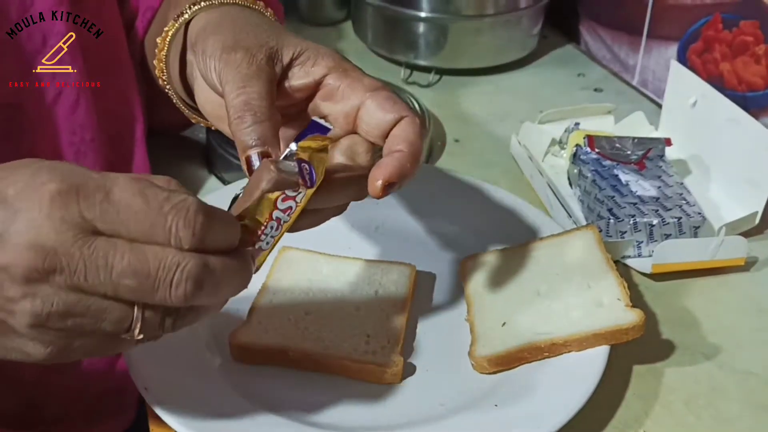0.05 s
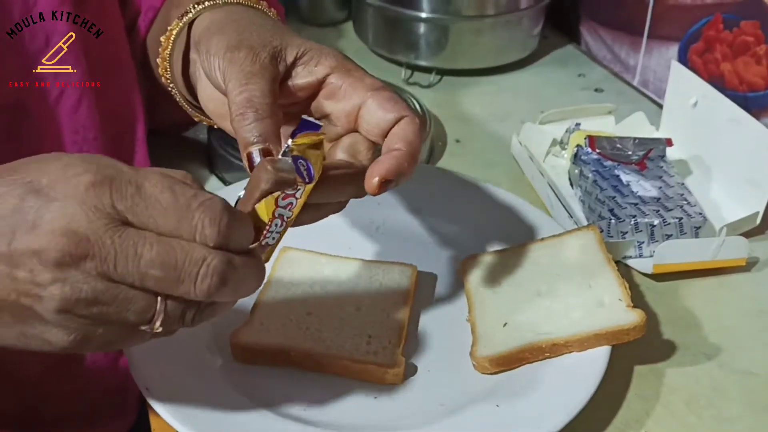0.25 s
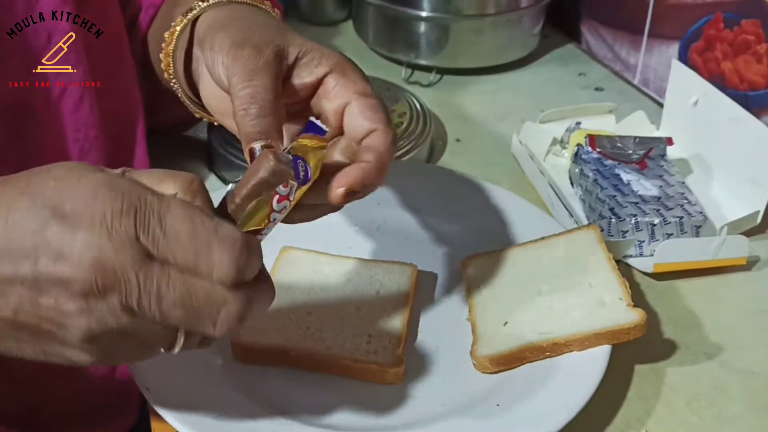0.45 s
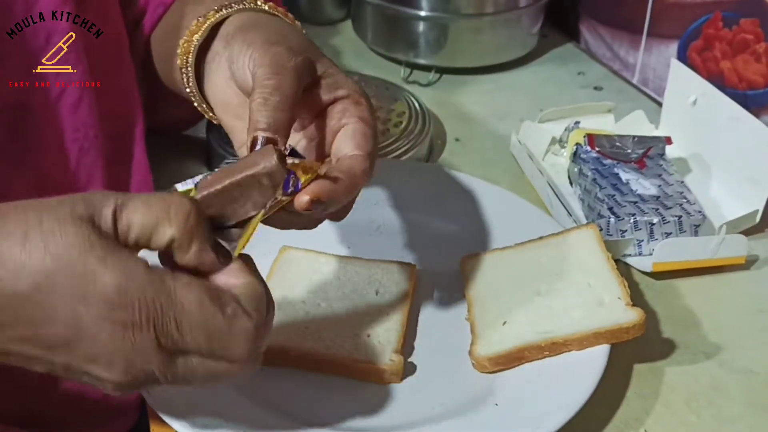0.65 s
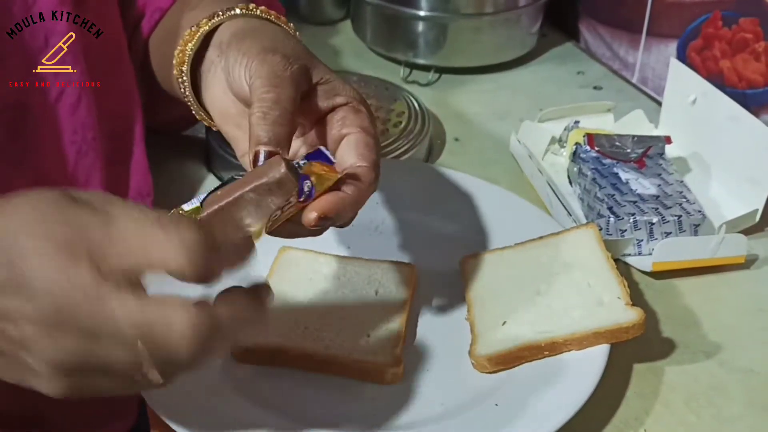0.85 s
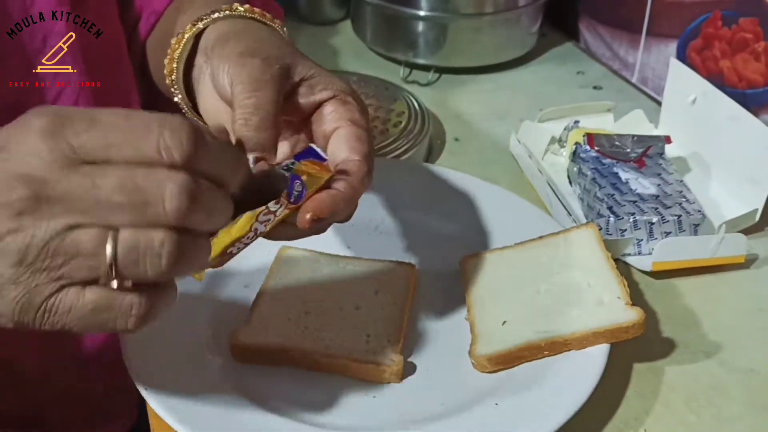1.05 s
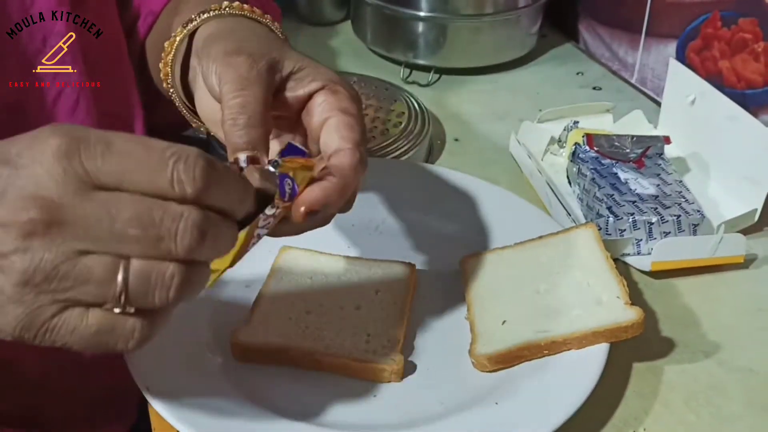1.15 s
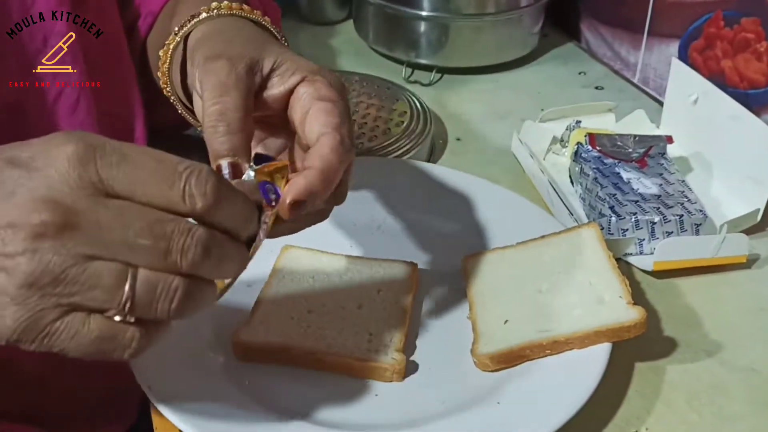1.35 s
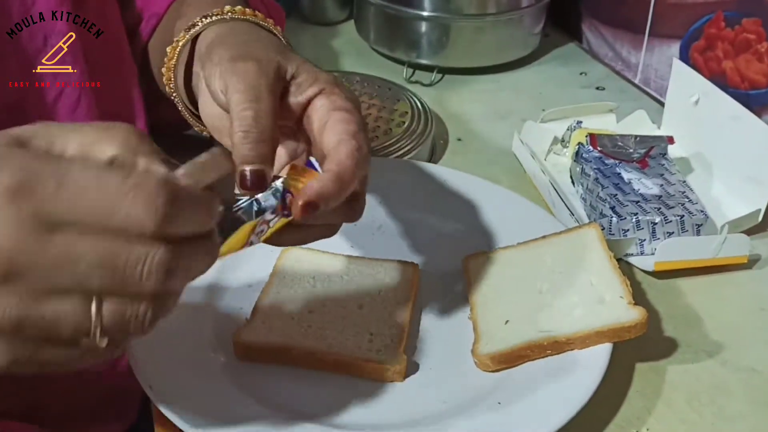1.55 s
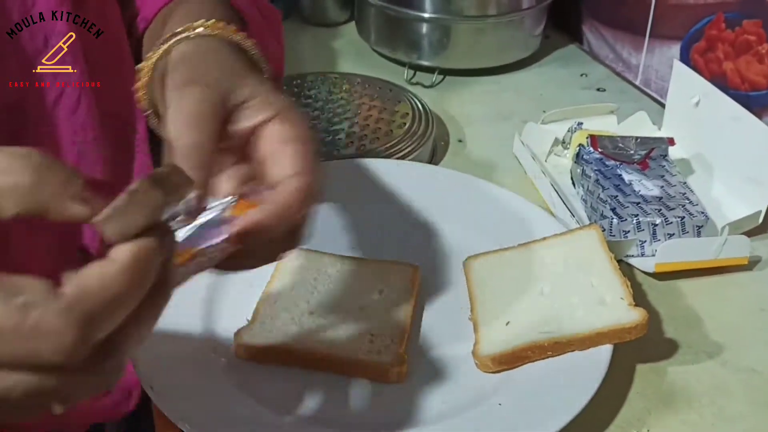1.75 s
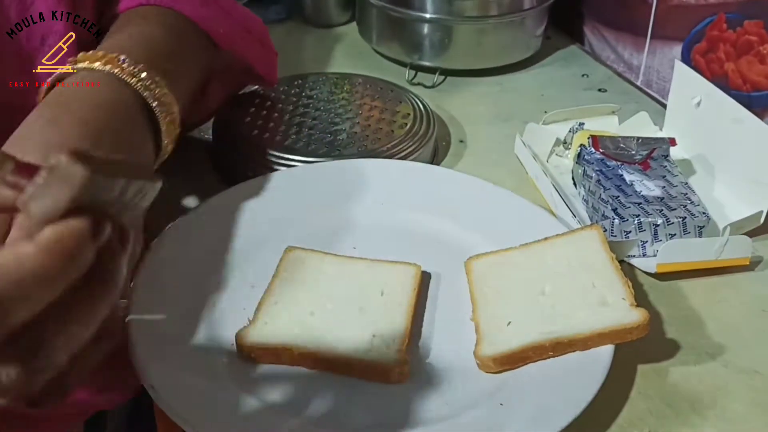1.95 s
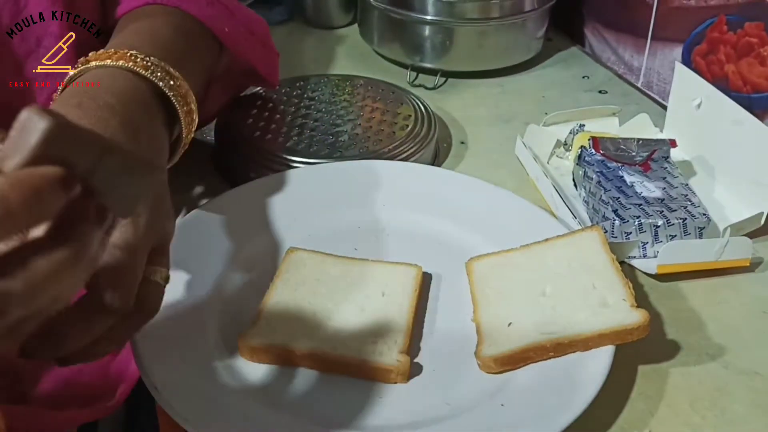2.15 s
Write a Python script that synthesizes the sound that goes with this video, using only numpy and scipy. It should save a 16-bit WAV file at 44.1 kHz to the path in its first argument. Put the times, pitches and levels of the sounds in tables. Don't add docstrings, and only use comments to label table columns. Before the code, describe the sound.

Foil candy wrapper crackling sharply as fingers tear and peel it, close up in a kitchen

```python
import sys
import numpy as np
from scipy import signal
from scipy.fft import rfft, irfft
from scipy.io import wavfile

SR = 44100
rng = np.random.default_rng(int(sys.argv[2]) if len(sys.argv) > 2 else 0)


def rack_gain(trim_db):
    fader = np.asarray(trim_db, float)
    return 10 ** (fader / 20)


def generate_wav(sig):
    pcm = np.round(np.clip(np.atleast_2d(sig).T, -1, 1) * 32767).astype(np.int16)
    wavfile.write(sys.argv[1], SR, pcm)


N = 97020


def rms_one(x):
    return x / np.sqrt(np.mean(x ** 2) + 1e-20)


def ring(clicks, hz, t60):
    r = rack_gain(-60 / (t60 * SR))
    w = 2 * np.pi * min(hz, 0.45 * SR) / SR
    return signal.lfilter([0, np.sin(w)], [1, -2 * r * np.cos(w), r * r], clicks + 1e-18)


def bandpass(x, order, edges_hz):
    return signal.sosfilt(signal.butter(order, edges_hz, "band", fs=SR, output="sos"), x)


def colour(x, points):
    hz, db = np.transpose(points)
    f = np.maximum(np.arange(len(x) // 2 + 1) * SR / len(x), 1)
    gain = rack_gain(np.interp(np.log(f), np.log(hz), db))
    return irfft(rfft(x) * gain, len(x))


# pitch_hz, level_db
FAN_COLOUR = [(25, -35.5), (60, -8.5), (130, -2), (350, -13.5), (750, -17), (1100, -24), (7500, -21.5),
              (11000, -28.5), (16000, -45.5)]


def fan():
    return rack_gain(-53) * rms_one(colour(rng.standard_normal(N), FAN_COLOUR))


# time_s, level_db
HANDLING = [(0, -47.5), (.15, -41.5), (.32, -54.5), (.45, -34), (.75, -43), (.84, -45), (0.959, -30.5),
            (1.051, -52.5), (1.3, -46), (1.4, -49.5), (1.6, -31.5), (1.702, -42), (1.748, -18),
            (1.849, -79), (1.998, -34.5), (2.2, -55.5)]
# pitch_hz, level_db (per Hz)
CRACKLE_COLOUR = [(400, -22.5), (900, -24.5), (2000, -19.5), (3500, -13), (5300, -12), (7800, -4),
                  (10500, -15), (14000, -10)]
CRACKLES_PER_S, CRACKLE_SIZE_DB, CRACKLE_DB = 6000, 3, -8


def crackle():
    clump = np.repeat(rng.standard_normal(N // 300 + 1), 300)[:N]
    sizes = rack_gain(CRACKLE_SIZE_DB * np.minimum(rng.exponential(1, N), 3)) * rng.choice([-1, 1], N)
    born = rng.random(N) < CRACKLES_PER_S * rack_gain(3.0 * clump) / SR
    patch_of = rng.integers(0, 8, N)
    edges = np.geomspace(500, 16000, 10)
    patches = np.zeros(N)
    for k in range(8):
        clicks = sizes * born * (patch_of == k) + 1e-18
        patches += bandpass(clicks, 2, edges[[k + 1, k + 2]] * [0.9, 1])
    time_s, effort_db = np.transpose(HANDLING)
    level = rack_gain(np.interp(np.arange(N) / SR, time_s, effort_db) + CRACKLE_DB)
    return level * rms_one(colour(patches, CRACKLE_COLOUR))


# start_s, peak_db, then low_body_db, mid_band_db, top_fizz_db (these three are
CREASES = [(0.052, -33, -3, -10, -4), (0.0739, -11.5, -26, -17, -4.5), (0.1009, -17.5, -19, -1, 2.5),
           (0.106, -31.5, 0, 13, -2.5), (0.1109, -30.5, -4, -3, -5), (0.179, -37, -18, -6, 8),
           (0.1865, -29, -20, -4, -6), (0.201, -10.5, -14.5, -6, -10.5), (0.242, -22, -17, -17, -0.5),
           (0.2584, -10, -28.5, -12.5, -5), (0.2666, -30.5, -7, 2, 4), (0.3341, -13.5, -17, -9.5, 3.5),
           (0.3828, -3.5, -33.5, -17.5, -1.5), (0.3975, -23, -28, -9, -13.5), (0.4282, -6.5, -27.5, -11.5, -9),
           (0.4448, -17, -25.5, -9.5, -4.5), (0.489, -23, -24, -3, 5), (0.5248, -18.5, -31, -12, -6),
           (0.5387, -8.5, -20, -10, 0.5), (0.5488, -14, -19, -10, 0), (0.5752, -25.5, -28.5, -5, -11.5),
           (0.5924, -33, -15, -10, 0.5), (0.6204, -10.5, -31.5, -1.5, -2), (0.6263, -28.5, -10, 3, 3),
           (0.6454, -16.5, -8, -1, 1), (0.6672, -16, -41.5, -3, -19),
           (0.6892, -13, -30, -8, -1), (0.6956, -4.5, -19.5, 12, -4.5), (0.7013, -4.5, -18, -3.5, -5.5),
        (0.7246, -16, -12, -7, -5), (0.7316, -18.5, -18.5, 2, -13), (0.7455, -5, -21.5, -8.5, -8.5),
        (0.7526, -15, -13, -8.5, -2.5), (0.7927, -10, -13, -4.5, -4.5), (0.8464, -26, -34.5, -3, -1),
        (0.8579, -16, -18.5, 2, -8.5), (0.8889, -29, -26, -9, -4.5), (0.9037, -29.5, -27.5, -10, 9.5),
        (0.917, -22, -24.5, -6, -9), (0.9215, -13.5, -14.5, 1, -2), (0.9351, -16, -21.5, -0.5, -4.5),
        (0.9432, -14, -20.5, -8, -2.5), (0.9529, -13, -28.5, 1, 1), (0.9649, -17.5, -16.5, -0.5, -3),
        (1.0028, 1.5, -38, -21, -20.5), (1.0074, -11, -21, -13.5, 1), (1.0195, -34, -29.5, -17.5, -13),
        (1.0689, -26.5, -29, -9, -0.5), (1.151, -51, -12, -2.5, -5.5), (1.16, -52, -28, -16.5, -7),
        (1.199, -34.5, -16.5, -17, -3), (1.2064, -30, -32, -8, -11),
           (1.2244, -30, -14, -4, 3), (1.2479, -23.5, -13, -10.5, -12), (1.323, -25.5, -35, -8, -4),
         (1.3534, -35.5, -21, -4, 2), (1.364, -24.5, -20, -2, -8), (1.3749, -31.5, -12, -13.5, -8),
         (1.4072, -25, -30, -8, -1.5), (1.4691, -40, -12, -7, 5.5), (1.4871, -24, -42, -18, -7),
         (1.4978, -18, -46, -22, -3), (1.5247, -7.5, -13.5, -6.5, -11.5), (1.5917, -24.5, -10.5, -10, -13),
         (1.6335, -26, -2, 8, -8), (1.6527, -17.5, -9, -6, 6), (1.6625, -11, -17, -8, -6),
         (1.6832, -16.5, -24, -11, 4), (1.7105, -33, 3, 7, -11), (1.7242, -8.5, -16, 1.5, -1.5),
         (1.7409, -9, -14, -5, -7), (1.7612, -14, -9.5, -2, 1), (1.8039, -21, -16, -10, 3),
         (1.9583, -28, -20, -7, -2.5), (2.005, -19.5, -14, -6.5, -9), (2.0147, -28, -24, -3, -4),
         (2.0698, -35, -22, 0, 2), (2.1436, -36, -6.5, -2, -1)]
# start_s, peak_db
AGAIN = [(0.0749, -14), (0.076, -23), (0.079, -33), (0.181, -29), (0.2025, -19), (0.2049, -29),
         (0.205, -25), (0.2586, -22.5), (0.337, -30), (0.3845, -13), (0.3877, -26), (0.3901, -31),
         (0.3898, -14.5), (0.4293, -10.5), (0.4331, -22), (0.4353, -20), (0.4467, -5.5),
         (0.45, -16.5), (0.4517, -27), (0.4549, -22), (0.4906, -25), (0.4934, -22), (0.4965, -14.5),
         (0.4993, -12.5), (0.525, -24), (0.5428, -8.5), (0.5437, -9), (0.5522, -29), (0.5562, -24),
         (0.5952, -23.5), (0.5957, -25), (0.6207, -7.5), (0.6274, -20.5), (0.6468, -15.5),
         (0.6901, -16.5), (0.6965, -4), (0.6985, -13), (0.7028, -9.5), (0.7049, -17), (0.7342, -11),
         (0.7468, -4.5), (0.7564, -17.5), (0.758, -25.5), (0.7961, -21.5), (0.7988, -24.5),
         (0.8468, -24), (0.8592, -17.5),
         (0.8632, -29), (0.9248, -28), (0.9438, -14.5), (0.9544, -14), (0.9554, -28), (0.9599, -20),
              (0.9612, -18), (0.9683, -18.5), (0.9697, -15.5), (0.9732, -18), (1.0041, -5), (1.0096, -22),
              (1.012, -18), (1.0138, -17), (1.0166, -36), (1.0187, -34), (1.0694, -22.5), (1.2012, -30.5),
              (1.2026, -42), (1.2241, -25.5), (1.376, -34), (1.3775, -25), (1.3781, -17.5), (1.3794, -26.5),
              (1.4094, -29), (1.4693, -24), (1.4979, -19.5), (1.5, -29), (1.5259, -10.5), (1.5267, -26),
              (1.5287, -16.5), (1.5308, -23), (1.5317, -20), (1.5335, -41), (1.5936, -25.5), (1.596, -32),
              (1.6634, -12.5), (1.6651, -9.5), (1.6691, -28), (1.6708, -28), (1.7256, -11.5), (1.729, -11),
              (1.7302, -7.5), (1.7336, -28), (1.742, -12), (1.7633, -18), (1.806, -31.5), (1.9587, -22),
              (1.96, -20), (2.0065, -15), (2.0104, -31), (2.1475, -37)]
# centre_hz, width_octaves, gain_db
SNAP_ZONES = [
    (976, 1, -17),
    (1975, 1.0, -2.5),
    (3520, 0.66, 3),
    (5510, 0.5, 1.4),
    (7834, 0.29, 0.55),
    (9790, 0.54, -1.5),
    (13600, 0.18, 0.5),
]
ZONE_WANDER_OCT, ZONE_SCATTER_S = 0.03, 0.00015
PEAK_SPREAD_DB, SNAP_DB = 1.2, 1.5


def snaps():
    creases = CREASES
    again = np.array(AGAIN)
    owner = np.searchsorted([crease[0] for crease in creases], again[:, 0]) - 1
    luck = rng.standard_normal((len(creases), 7, 8, 3))
    size = 1024
    out = np.zeros(N + SR)
    for k, (s, db, low, mid, top) in enumerate(creases):
        times, peaks_db = np.vstack([[s, db], again[owner == k]]).T
        zone_levels_db = (low, low, 0.85 * low + 0.47 * mid, mid, 0, top / 2, top)
        sound, power = 0, 0
        for (hz, width, gain_db), zone_db, draw in zip(SNAP_ZONES, zone_levels_db, luck[k]):
            draw = draw[:len(times)]
            late_s = ZONE_SCATTER_S * np.abs(draw[:, 0])
            heights = rack_gain(peaks_db + PEAK_SPREAD_DB * draw[:, 1]) * np.sign(draw[:, 2])
            clicks = np.zeros((2, size))
            clicks[0, 0] = 1
            clicks[1, ((times - s + late_s) * SR).astype(int)] = heights
            octaves = ZONE_WANDER_OCT * draw[0, 2] + width * np.array([-0.5, 0.5])
            edges = np.minimum(hz * 2 ** octaves, [0.4 * SR, 0.45 * SR])
            unit, packet = bandpass(clicks, 3, edges)
            level = rack_gain(zone_db + gain_db)
            sound = sound + level * packet / np.abs(unit).max()
            power += level ** 2
        out[int(s * SR):][:size] += rack_gain(SNAP_DB) * sound / np.sqrt(power)
    return out[:N]


# pitch_hz, level_db
WALLS = [(500, 18), (1500, -3.5), (3500, 3), (7800, -10), (14000, -8)]
NEAR_DB, NEAR_T60_S = -22.5, 0.027
ROOM_DB, ROOM_T60_S = -29.5, 0.19


def kitchen(x):
    t = np.arange(SR // 2) / SR
    near, far = rng.standard_normal((2, len(t)))
    scatter = rack_gain(NEAR_DB - 60 * t / NEAR_T60_S) * near
    wash = rack_gain(ROOM_DB - 60 * t / ROOM_T60_S) * colour(far, WALLS)
    echoes = (scatter + wash) * np.minimum(t / 0.0009, 1)
    return x + signal.fftconvolve(x, echoes)[:N]


# start_s, length_s, level_db, pitch_hz
RUBS = [
    (.33, .24, -58, 620),
    (1.045, .055, -59, 770),
    (1.54, .1, -55, 540),
]


def rubs():
    out = np.zeros(N)
    t = np.arange(N) / SR
    for s, length, db, hz in RUBS:
        swell = np.sin(np.pi * np.clip((t - s) / length, 0, 1))
        hiss = rng.standard_normal(N)
        dull = ring(ring(hiss, hz, 5.0 / hz), hz, 5.0 / hz)
        out += rack_gain(db) * swell * rms_one(dull)
    return out


def knock(s, db, hz, t60):
    click = np.zeros(N)
    click[int(s * SR)] = rack_gain(db + 16)
    return ring(ring(click, hz, t60), hz, 3.0 / hz) * hz / SR


# start_s, peak_db, pitch_hz
THUMPS = [
    (.701, -37.5, 1300),
    (0.704, -40, 960),
    (0.746, -30, 890),
    (0.749, -42, 593),
    (1.003, -37.5, 172),
    (1.002, -38.5, 367),
    (1.226, -48.5, 880),
    (.578, -49, 886),
]


def thumps():
    return sum(knock(s, db, hz, 0.03) for s, db, hz in THUMPS)


# pitch_hz, level_db, t60_s
BANGLE = [(5900, -0.5, 0.15), (8480, -3, 0.2), (10000, 1.5, 0.032)]
TICK_S, TICK_DB = 2.069, -48


def bangle():
    return sum(knock(TICK_S, TICK_DB + db, hz, t60) for hz, db, t60 in BANGLE)


def scene():
    wrapper = kitchen(snaps() + crackle())
    return (wrapper + thumps() + bangle() + rubs() + fan())[None]


def band_limit(x):
    return signal.sosfilt(signal.butter(12, 16810, fs=SR, output="sos"), x)


# shut_s, reopen_s, depth_db
GATE = [
    (-.1, 0.097, 5.5),
    (0.303, 0.336, 7.5),
    (1.099, 1.193, 15.5),
    (1.281, 1.35, 8.5),
    (1.844, 1.96, 12.5),
    (2.086, 2.142, 8.5),
    (2.147, 2.3, 5.5),
]
GATE_FADE_S, GATE_BASS_SHARE = 0.015, 0.85
OVERLOAD, CUTOFF_HZ = 0.93, 15900


def record(dry):
    depth_db = np.zeros(N)
    t = np.arange(N) / SR
    for shut, reopen, db in GATE:
        closing = np.clip((t - shut) / GATE_FADE_S + 0.5, 0, 1)
        opening = np.clip((reopen - t) / 0.001, 0, 1)
        depth_db += db * closing * opening
    bass = signal.sosfiltfilt(signal.butter(1, 300, fs=SR, output="sos"), dry)
    gated = bass * rack_gain(-GATE_BASS_SHARE * depth_db) + (dry - bass) * rack_gain(-depth_db)
    clipped = np.clip(gated, -OVERLOAD, OVERLOAD)
    mix = signal.sosfilt(signal.cheby2(10, 30, CUTOFF_HZ, fs=SR, output="sos"), clipped)
    return band_limit(mix)


dry = scene()
out = record(dry)
generate_wav(out)
```